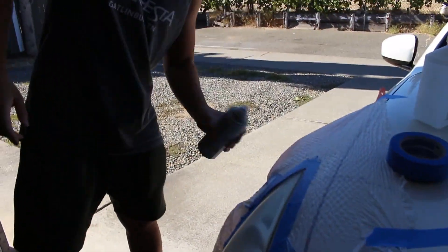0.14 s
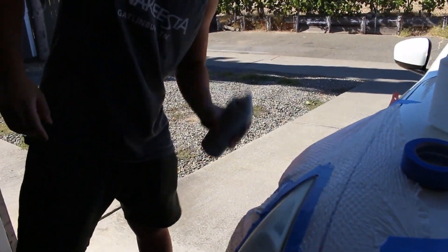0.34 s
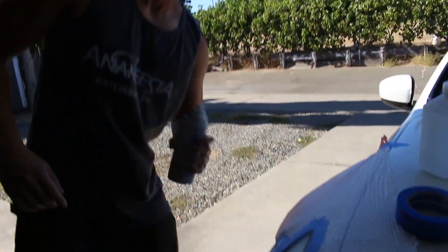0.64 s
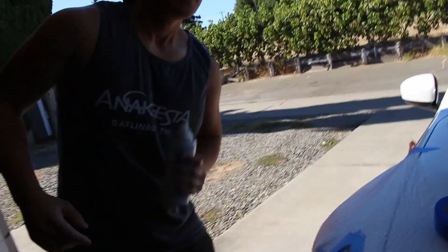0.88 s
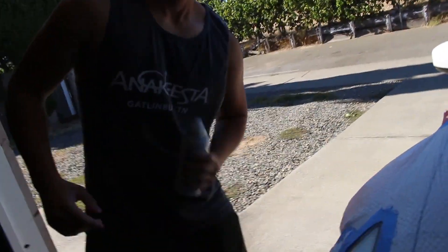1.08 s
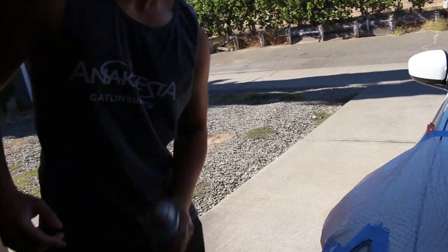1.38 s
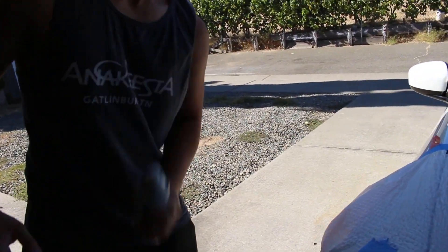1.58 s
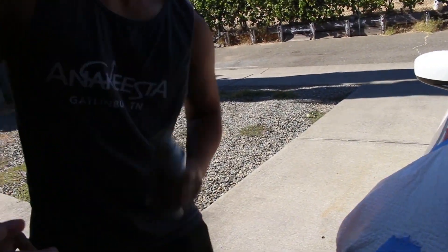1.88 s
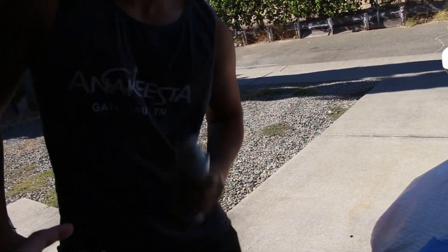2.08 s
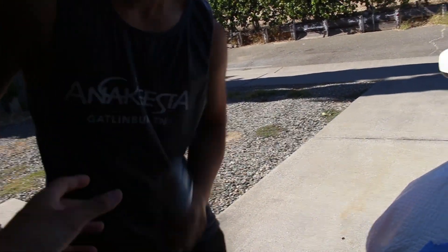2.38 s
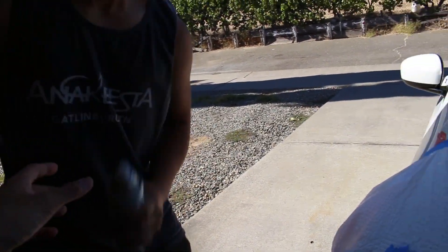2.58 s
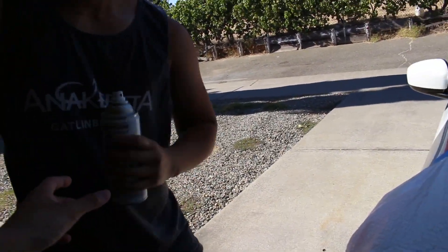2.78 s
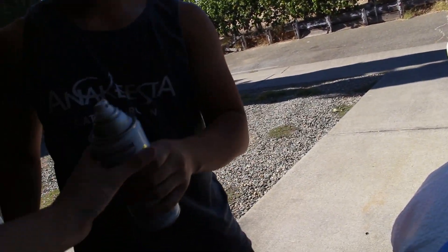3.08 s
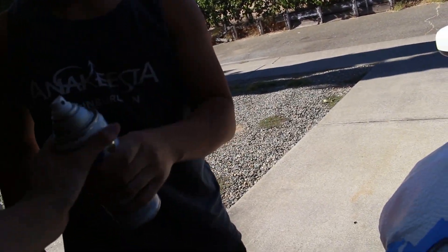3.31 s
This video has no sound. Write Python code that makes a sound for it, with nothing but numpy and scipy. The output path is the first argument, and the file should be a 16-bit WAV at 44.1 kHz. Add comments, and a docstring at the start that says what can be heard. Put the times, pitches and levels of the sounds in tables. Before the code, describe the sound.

A spray paint can rattles as it is shaken, the ball clacking sharply against thin metal.

```python
"""Shaking a spray can

At the mouth of a garage a can is shaken hard, about five strokes a second, then slows. The mixing ball
cracks against base and dome in turn and knocks on the wall in between, while the paint sloshes.
The garage rings briefly after each blow; outdoor air and a machine's hum lie under it all."""
import sys
import numpy as np
from scipy import signal
from scipy.fft import rfft, irfft
from scipy.io import wavfile
from scipy.ndimage import uniform_filter1d

SR = 44100
rng = np.random.default_rng(int(sys.argv[2]) if len(sys.argv) > 2 else 0)


def dump_mix(stems):
    """Bounce the given channels to the path in sys.argv[1] as a 16-bit WAV at rate SR."""
    frames = np.atleast_2d(stems).T  # one column per channel
    limited = np.clip(frames, -1, 1)  # hard clip at full scale
    pcm = np.round(limited * 32767).astype(np.int16)
    wavfile.write(sys.argv[1], SR, pcm)


N = 152145
LEAD = SR // 5  # pre-roll [samples]
HZ = np.maximum(np.arange(2049) * SR / 4096, 1)  # frequency grid of the EQ curves


def from_db(db):
    """Decibels to gain."""
    return 10 ** (np.asarray(db) / 20)


def unit_rms(x):
    """Scale to unit rms."""
    return x / np.sqrt(np.mean(x ** 2) + 1e-20)


def at_hz(points, hz, column=1):
    """Read one column of a table on a log-frequency axis."""
    table = np.array(points)
    return np.interp(np.log(hz), np.log(table[:, 0]), table[:, column])


def add(track, s, sound):
    """Mix a sound in at s seconds on a track with pre-roll."""
    start = LEAD + int(s * SR)
    part = track[..., start:start + sound.shape[-1]]
    part += sound[..., :part.shape[-1]]


def panned(x, db):
    """Raise the left and lower the right by db."""
    return x * from_db([[db], [-db]])


def causal(gain):
    """Minimum-phase response with these gains on HZ."""
    cepstrum = irfft(np.log(gain + 1e-9))
    cepstrum[1:len(HZ) - 1] *= 2
    cepstrum[len(HZ):] = 0
    return np.exp(rfft(cepstrum))


def ping(hz, t60):
    """One dying mode."""
    t = np.arange(SR // 4) / SR
    return np.sin(2 * np.pi * hz * t) * from_db(-60 * t / t60)


def contact_colour(colour, bass_db, treble_db, top_db):
    """Each blow lands a little differently and tilts the colour of its end of the can."""
    tilt = [(1600, bass_db), (2600, 0), (4000, 0), (5600, treble_db), (7800, treble_db), (10000, top_db)]
    return from_db(at_hz(colour, HZ) + at_hz(tilt, HZ))


# stereo width of the cracks: (frequency [Hz], side minus mid [dB])
CRACK_WIDTH = [(500, -16), (2000, -14), (4000, -10), (8000, -10), (13000, -11)]


def crack(gain, hold_s, fall_s, skirt_db, skirt_s, tick_db, left_lead_s=.000015):
    """A sharp tick at contact, then the blow races around the thin steel as a dense, coloured burst."""
    t = np.arange(2 * len(HZ) - 2) / SR
    envelope = np.exp(-np.maximum(t - hold_s, 0) / fall_s) + from_db(skirt_db) * np.exp(-t / skirt_s)
    tick = from_db(tick_db) * np.diff(np.eye(1, len(t) + 2, 4)[0], 2)
    bursts = rfft(envelope * rng.standard_normal((2, len(t))) + tick * [[1], [0]])
    # flatten each burst's spectrum, then colour it
    mid, side = [b * causal(gain / np.sqrt(uniform_filter1d(abs(b) ** 2, size=130))) for b in bursts]
    side *= from_db(at_hz(CRACK_WIDTH, HZ))
    left = (mid + side) * np.exp(2j * np.pi * HZ * left_lead_s)
    return irfft(np.array([left, mid - side]))


# ball on the base: (time [s], level [dB], bass [dB], treble [dB], top [dB], rattle send [dB])
BASE_HITS = [(-0.025, 17, 0, 0, 0, 3.0), (0.1956, 18.8, 0, -3, -3, 6), (0.3875, 19.8, 0, -2, -1, -2),
             (0.8163, 14.5, 0, -2, -3, 5), (0.9978, 24.5, -2, -1, -2, -5), (1.0074, 16.9, 4, 0, -7, 1),
             (1.2036, 21.4, -2, 4, 3, -1), (1.2248, 14.8, 1, 4, 2, 0), (1.4066, 22.2, -2, 4, -1, -4),
             (1.6315, 21.5, -3, -5, -1, 3), (1.657, 16.0, -1, -2, -2, 7), (1.8375, 21.2, -2, -3, 0, -6),
             (2.0391, 20.4, -2, -4, -4, 0), (2.0519, 19.2, 2, -8, -3, 5), (2.0876, 15.8, 3, 1, 0, -1),
             (2.2322, 21.3, -3, 2, 4, -5), (2.4311, 21.9, -3, 0, 1, -2), (2.6376, 16.2, 3, 3, 6, 3)]
# EQ of the base: (frequency [Hz], gain [dB])
BASE_COLOUR = [(300, -34), (700, -22), (1200, -10), (1700, -8), (2400, -3), (3300, 0), (4200, -4),
               (5200, -7), (6300, -11), (8000, -16), (11000, -22), (15500, -31)]
# envelope of a base crack: (hold [s], fall [s], skirt level [dB], skirt fall [s], tick [dB])
BASE_CRACK = (.0015, .0007, -12.5, .006, 18)


def base_hits(touches_per_s=1500, rattle_fall_s=.044, slide_rise_s=.008):
    """The ball slides down the wall, cracks on the base and settles with a fine dying rattle."""
    out = np.zeros((2, LEAD + N))
    t = np.arange(SR // 5) / SR
    band_loss = np.hypot(1, 2000 / HZ) * np.hypot(1, HZ / 18000)  # gentle low and high cuts
    steel = irfft(causal(from_db(at_hz(BASE_COLOUR, HZ)) / band_loss))
    for s, db, bass, treble, top, rattle_db in BASE_HITS:
        colour = contact_colour(BASE_COLOUR, bass, treble, top)
        add(out, s, from_db(db + .5) * crack(colour, *BASE_CRACK))
        touches = (rng.random(len(t)) < touches_per_s / SR) * rng.standard_normal(len(t))
        rattle = touches * np.exp(-t / rattle_fall_s)
        add(out, s, from_db(db + rattle_db - 22.8) * signal.fftconvolve(rattle, steel))
        slide = rng.standard_normal(len(t)) * np.sqrt(touches_per_s / SR) * np.exp(-t[::-1] / slide_rise_s)
        add(out, s - t[-1], from_db(db - 28) * signal.fftconvolve(slide, steel))
    return out


# garage reverb: (frequency [Hz], level [dB], t60 [s])
GARAGE_TAIL = [(300, -9, .42), (1000, -5, .4), (2000, -5.5, .39), (3500, -4, .4), (6000, -4.5, .38),
               (10000, -5.5, .33), (16000, -6, .25)]
# stereo width of the reverb: (frequency [Hz], side minus mid [dB])
GARAGE_WIDTH = [(300, -9), (1000, -7), (2000, -4), (4000, -1.5), (12000, 0)]


def garage(can, places=7, onset_s=.005):
    """A diffuse tail that dies sooner in the treble; its fine pattern changes as the can moves."""
    t = np.arange(SR // 2) / SR
    edges, tails = np.geomspace(200, 17000, 12), 0
    for low, high in zip(edges, edges[1:]):
        hz = np.sqrt(low * high)
        decay = from_db(-60 * t / at_hz(GARAGE_TAIL, hz, column=2))
        envelope = decay * (1 - np.exp(-(t / onset_s) ** 2))
        band = signal.butter(2, [low, high], "band", fs=SR, output="sos")
        mid, side = signal.sosfilt(band, rng.standard_normal((2, places, 1, len(t))))
        noise = (mid + from_db(at_hz(GARAGE_WIDTH, hz)) * side * [[1], [-1]]) / np.sqrt(2)
        tails += from_db(at_hz(GARAGE_TAIL, hz)) * noise * envelope / np.linalg.norm(envelope)
    # each blow on base or dome switches the send to the next tail
    hit_times = sorted(hit[0] for hit in [*BASE_HITS, *DOME_HITS])
    place = np.searchsorted(hit_times, (np.arange(-LEAD, N) + 2) / SR) % places
    send = can.mean(axis=0, keepdims=True)
    wet = sum(signal.fftconvolve(send * (place == k), tail, axes=1) for k, tail in enumerate(tails))
    return wet[:, :LEAD + N]


# EQ of the outdoor air: (frequency [Hz], gain [dB])
AIR_COLOUR = [(20, -24), (40, -12), (60, -3), (120, 0), (190, -5), (400, -13.5), (600, -13), (1200, -12.5),
              (2500, -22), (4000, -25), (8000, -35), (16000, -47)]


def air(level_db=-44.5, side_db=-11):
    """Outdoor air: a steady bed of dark noise."""
    hz = np.maximum(np.arange(N // 2 + 1) * SR / N, 1)
    spectrum = rfft(rng.standard_normal((2, N))) * from_db(at_hz(AIR_COLOUR, hz))
    mid, side = unit_rms(irfft(spectrum, N))
    return from_db(level_db) * (mid + from_db(side_db) * side * [[1], [-1]])


def drift(knots_per_s):
    """Slow random curve of spread about 1."""
    return np.interp(np.arange(N) / SR * knots_per_s, np.arange(200), rng.standard_normal(200))


# the machine's upper tones: (pitch [Hz], level [dB])
HUM_TONES = [(118.4, -55), (161, -56), (295.5, -56), (554.5, -63)]
# fader ride of its two low drones: (time [s], lower drone [dB], upper drone [dB])
DRONE_LEVELS = [(0, -49, -56), (.7, -56, -55), (1.5, -62, -51), (2.1, -58, -48), (2.6, -46.5, -48.5),
                (3.1, -46, -52), (3.45, -52, -58)]


def machine_hum(drone_hz=(59.2, 80.7), waver=.35):
    """A machine's tones waver in level and phase; the lowest two swell and fade."""
    t = np.arange(N) / SR
    times, *rides = np.transpose(DRONE_LEVELS)
    drones = [(hz, np.interp(t, times, ride)) for hz, ride in zip(drone_hz, rides)]
    out = np.zeros(N)
    for hz, db in [*HUM_TONES, *drones]:
        amplitude = np.sqrt(2) * from_db(db) * (1 + waver * drift(3))
        out += amplitude * np.sin(2 * np.pi * hz * t + waver * drift(6))
    return out


def ring(clicks, hz, t60):
    """Each click sets a dying sine of its own height ringing."""
    radius, angle = from_db(-60 / (t60 * SR)), 2 * np.pi * hz / SR
    return signal.lfilter([0, np.sin(angle)], [1, -2 * radius * np.cos(angle), radius ** 2], clicks + 1e-18)


def slosh(delay_s=.06, spread_s=.02, bubbles_per_s=1000, t60_cycles=11):
    """The paint reaches the base just after the ball: a swell of small bubbles."""
    t = np.arange(-LEAD, N) / SR
    swells = [from_db(db) * np.exp(-.5 * ((t - s - delay_s) / spread_s) ** 2) for s, db, *_ in BASE_HITS]
    births = (rng.random(len(t)) < bubbles_per_s / SR) * rng.standard_normal(len(t))
    pitches_hz = np.geomspace(800, 2900, 20)
    voice = rng.integers(0, len(pitches_hz), len(t))
    bubbles = sum(ring(births * (voice == k), hz, t60_cycles / hz) for k, hz in enumerate(pitches_hz))
    return from_db(-58.3) * np.max(swells, axis=0) * unit_rms(bubbles)


# ball on the paint-damped wall: (time [s], level [dB], pitch [Hz], click send [dB])
WALL_KNOCKS = [(0.0498, 7.2, 1790.0, -21), (0.1009, 7.6, 1870.0, -17), (0.1244, 8.2, 1380.0, -19),
               (0.1616, 11.8, 1440.0, -22), (0.2454, 8.7, 1660.0, -11), (0.3431, 7.0, 1920.0, -18),
               (0.4282, 18.4, 1770.0, -17), (0.4448, 14.3, 1700.0, -18), (0.4996, 6.5, 1660.0, -11),
               (0.5538, 12.6, 1660.0, -16), (0.563, 2.8, 1680.0, -12), (0.6686, 6.7, 2500.0, -8),
               (0.7087, 15.9, 1890.0, -24), (0.874, 9.1, 1460.0, -7), (1.0649, 6.0, 1550.0, -9),
               (1.3867, 9.2, 2020.0, -15), (1.6047, 18.5, 1270.0, -17), (1.7885, 9.3, 2110.0, -12),
               (1.8088, 10.3, 1270.0, -15), (1.873, 14.1, 2150.0, -15), (1.9888, 14.7, 990.0, -13),
               (2.0275, 20.6, 1180.0, -19), (2.1741, 2.9, 930.0, -5), (2.2879, 7.1, 2150.0, -6),
               (2.5707, 10.1, 1920.0, -10), (2.6063, 17.7, 1310.0, -17), (2.6227, 9.8, 1160.0, -16),
               (2.672, 16.0, 1230.0, -13), (2.6913, 9.3, 1080.0, -10), (2.8422, 9.8, 1270.0, -18),
               (2.938, 2.4, 1510.0, -16), (3.0444, 14.9, 1510.0, -20), (3.1199, 8.9, 1440.0, -14),
               (3.1687, 4.3, 1160.0, -15)]
# envelope of a knock: (hold [s], fall [s], skirt level [dB], skirt fall [s], tick [dB])
WALL_CRACK = (.0016, .0011, -11, .005, -3)


def wall_knocks(width_oct=.36, low_cut_hz=550, click_cut_hz=3900):
    """Glancing knocks whose pitch depends on how much paint lies behind the wall."""
    out = np.zeros((2, LEAD + N))
    for s, db, hz, click_db in WALL_KNOCKS:
        knock = 1 / (1 + (np.log2(HZ / hz) / width_oct) ** 2)
        click = 1.3 * from_db(click_db) / np.hypot(1, (HZ / click_cut_hz) ** 2)
        colour = np.hypot(knock, click) / np.hypot(1, (low_cut_hz / HZ) ** 2)
        add(out, s, from_db(db - .5) * crack(colour, *WALL_CRACK))
        add(out, s, from_db(db - 50) * ping(hz, t60=.022))
    return out


# pitched rings of the can's wall: (time [s], level [dB], pitch [Hz])
WALL_RINGS = [(.05, -27, 1790), (.101, -26, 1870), (.343, -29, 1950), (.543, -31, 2080), (.554, -25, 920),
              (.588, -32, 1800), (.653, -21, 1780), (.686, -27, 1820), (.708, -22, 1900), (.731, -29, 2150),
              (1.066, -28, 820), (1.433, -26, 2150), (2.046, -20, 1050), (3.23, -31, 1900)]


def wall_rings(rise_s=.002):
    """Short pitched rings of the can's wall, after some knocks and from soft touches of the ball."""
    out = np.zeros(LEAD + N)
    for s, db, hz in WALL_RINGS:
        tone = ping(hz, t60=.035)
        attack = 1 - np.exp(-np.arange(len(tone)) / SR / rise_s)
        add(out, s, from_db(db) * tone * attack)
    return out


def struck(modes, blows, count=1, detune=.017):
    """Blows (time [s], level [dB]) ring modes; moving paint shifts each and splits it into count tones."""
    out = np.zeros(LEAD + N)
    tones = list(modes) * count
    for s, db in blows:
        for (hz, mode_db, t60), (louder, higher) in zip(tones, rng.standard_normal((len(tones), 2))):
            gain = from_db(db + mode_db + 2 * louder) * rng.choice([-1, 1])
            add(out, s, gain * ping(hz * (1 + detune * higher), t60))
    return out / np.sqrt(count)


# ball on the dome: (time [s], level [dB], bass [dB], treble [dB], top [dB], shell send [dB])
DOME_HITS = [(0.0886, 4.5, 0, 7, 8, -8), (0.6511, 10.9, 8, -7, -6, 2), (0.9208, 18.4, -10, -3, -7, -8),
             (1.1068, 15.5, -1, 2, -4, -8), (1.3231, 17.7, -5, 0, -1, -8), (1.5387, 13.7, -4, -1, 0, -8),
             (1.7491, 15.5, -2, 3, 0, -8), (1.9465, 11.9, 2, 2, 5, -8), (2.1533, 15.1, -3, 2, 1, -8),
             (2.3381, 15.4, 3, 1, -1, -8), (2.5414, 10.6, 4, 6, 8, -8), (2.7568, 14.5, -4, -6, -5, -8),
             (3.2469, 16.5, 0, -11, -6, 3), (3.3947, 12.7, -3, -7, -5, -14)]
# EQ of the dome: (frequency [Hz], gain [dB])
DOME_COLOUR = [(300, -26), (420, -23), (560, -14), (720, -15), (1150, -8), (1450, -8), (1800, -2),
               (2250, -1), (2650, -2), (3050, 1), (3700, -10), (5000, -7), (7400, -5), (8300, -8),
               (9200, -13), (10100, -12), (11200, -18), (13500, -23), (15500, -31)]
# envelope of a dome crack: (hold [s], fall [s], skirt level [dB], skirt fall [s], tick [dB])
DOME_CRACK = (.0016, .0007, -9.5, .006, 8)
# bright shimmer of the dome: (pitch [Hz], level [dB], t60 [s])
DOME_MODES = [(3080, -44.5, .06), (4820, -54, .08), (6020, -55, .08), (7400, -49, .07), (8200, -50.5, .1),
              (10200, -53, .09), (11900, -62, .08), (13700, -66, .07)]
# hollow note of the whole can: (pitch [Hz], level [dB], t60 [s])
BODY_MODES = [(540, -57, .04), (1120, -54, .035)]
# send from the dome blows to that note: (time [s], level [dB])
BODY_SEND = [(.7, -7), (1.5, -2), (2.0, 2), (2.7, 3), (3.2, -8)]
# midrange ring of the shell: (pitch [Hz], level [dB], t60 [s])
SHELL_MODES = [(1830, -36, .045), (1927, -45, .08), (2266, -46, .075), (3190, -61, .13)]


def dome_hits():
    """Lighter, brighter blows on the dry top of the can set dome, body and shell ringing."""
    out = np.zeros((2, LEAD + N))
    to_dome, to_body, to_shell = [], [], []
    for s, db, bass, treble, top, shell_db in DOME_HITS:
        colour = contact_colour(DOME_COLOUR, bass, treble, top)
        add(out, s, from_db(db + .2) * crack(colour, *DOME_CRACK))
        to_dome.append((s, db + treble / 2))
        to_body.append((s, db + np.interp(s, *np.transpose(BODY_SEND))))
        to_shell.append((s, db + shell_db))
    out += struck(DOME_MODES, to_dome, count=7)
    out += struck(BODY_MODES, to_body)
    return out + struck(SHELL_MODES, to_shell, count=3)


def scene():
    """The can and its reverb near the centre, over air and hum a little to the right."""
    can = base_hits() + dome_hits() + wall_knocks() + slosh() + wall_rings()
    can_in_garage = (can + garage(can))[:, LEAD:]
    return panned(can_in_garage, db=.5) + panned(air(), db=-1.7) + panned(machine_hum(), db=-2.1)


def record(dry):
    """The hardest cracks clip; a steep low-pass cuts the top."""
    cutoff_hz = 16600
    return signal.sosfilt(signal.cheby2(14, 60, cutoff_hz, fs=SR, output="sos"), np.clip(dry, -1, 1))


dry = scene()
out = record(dry)
dump_mix(out)
```